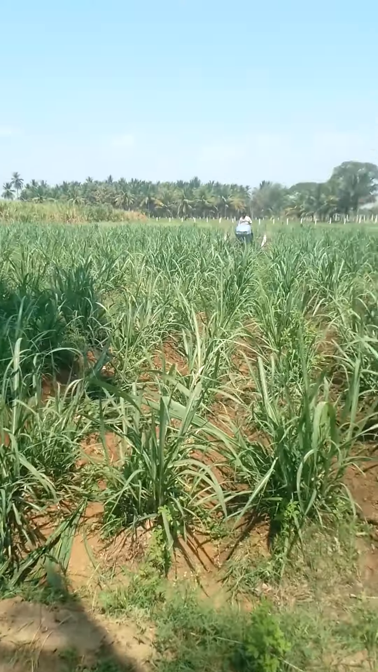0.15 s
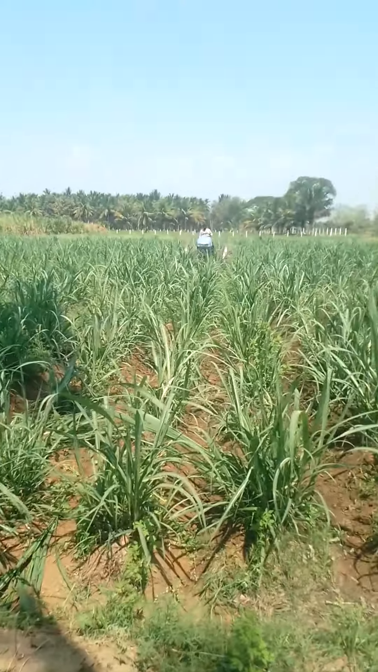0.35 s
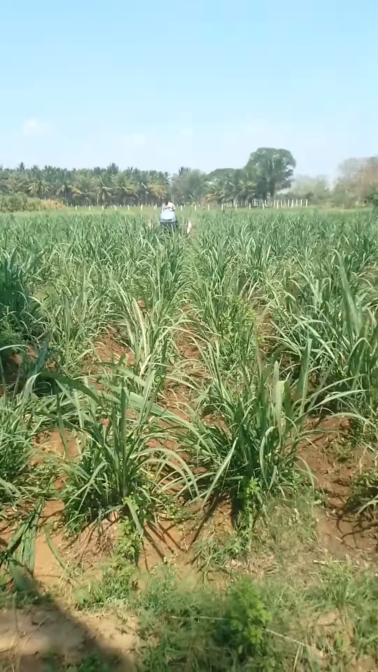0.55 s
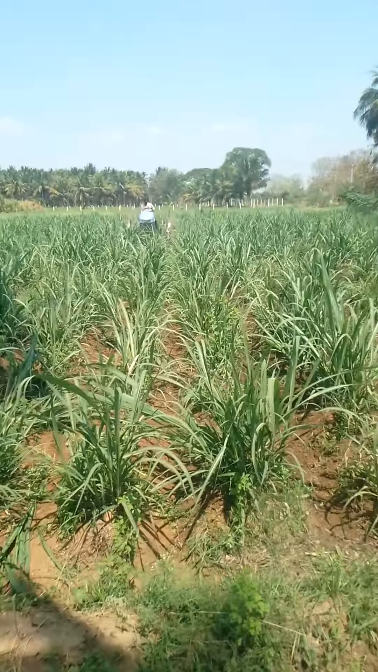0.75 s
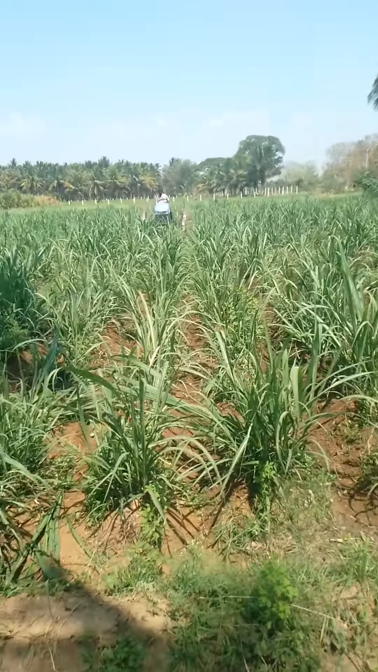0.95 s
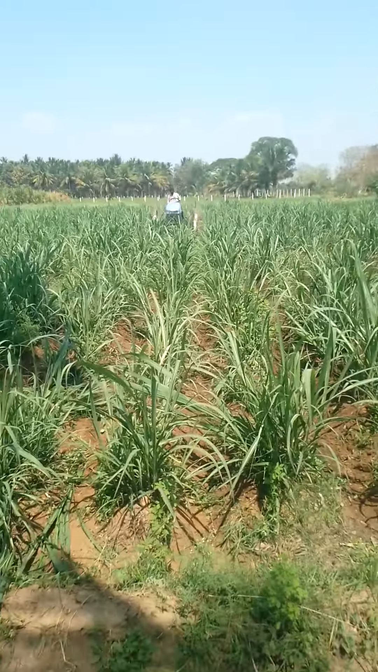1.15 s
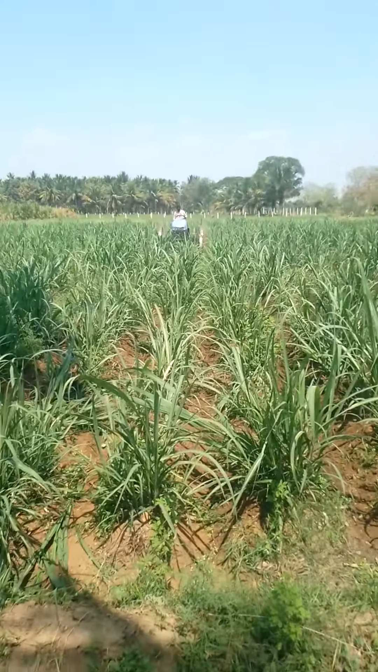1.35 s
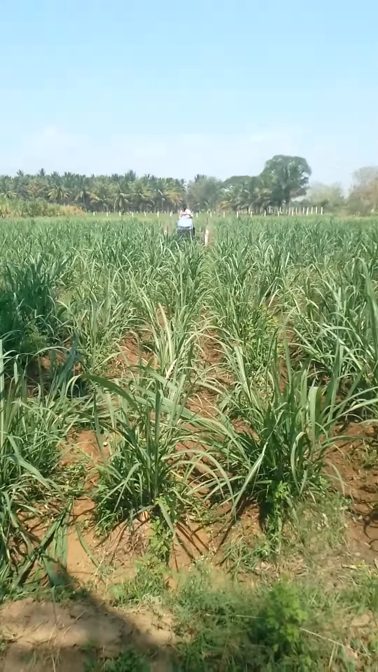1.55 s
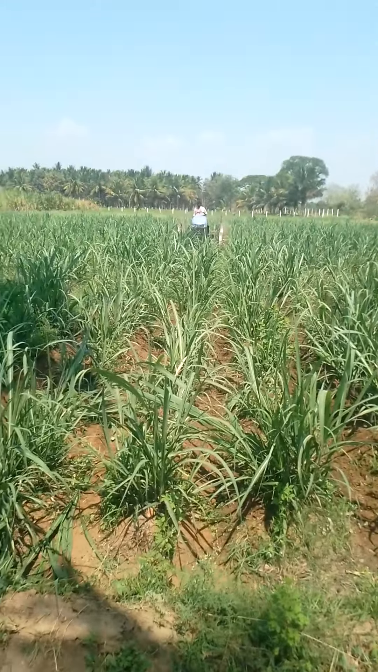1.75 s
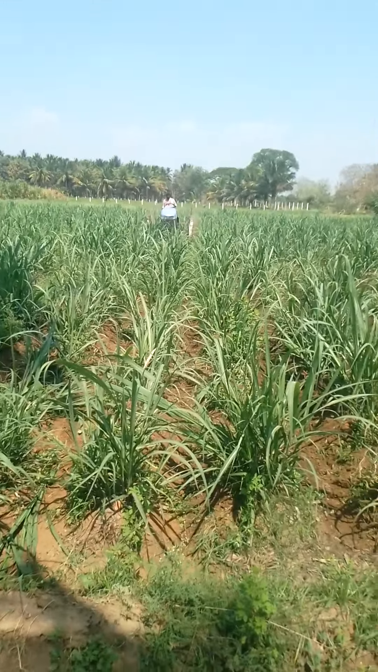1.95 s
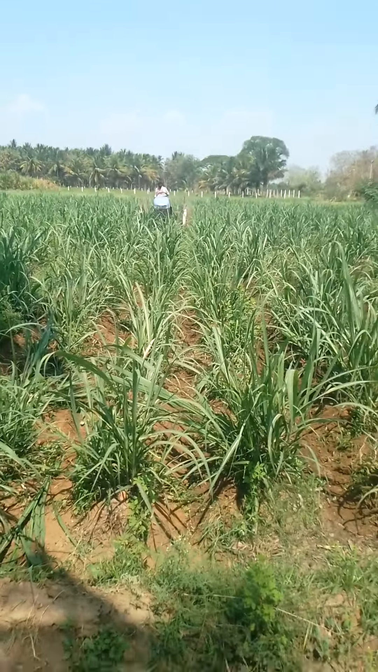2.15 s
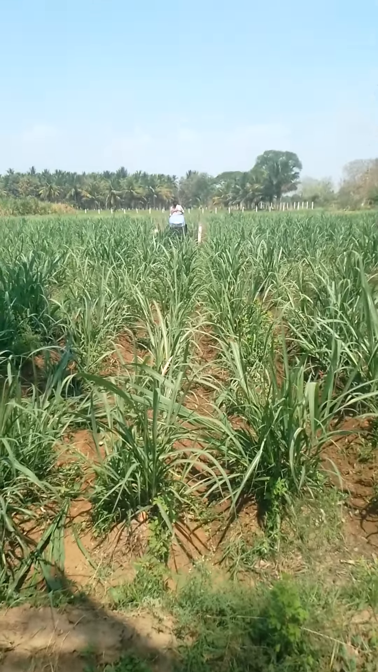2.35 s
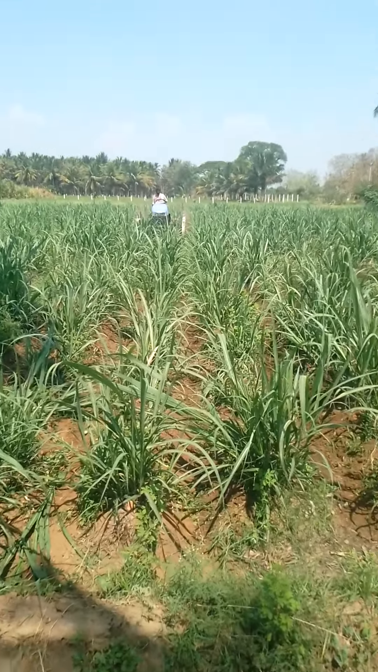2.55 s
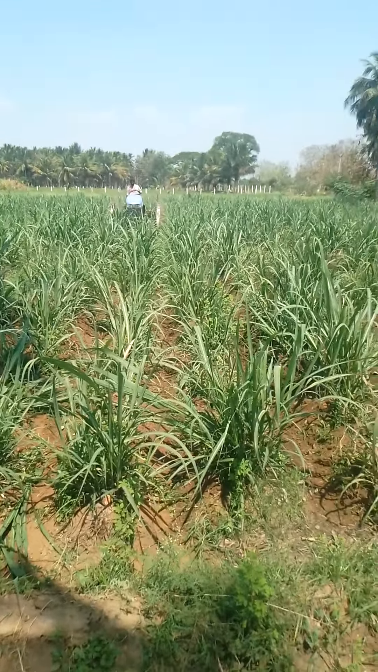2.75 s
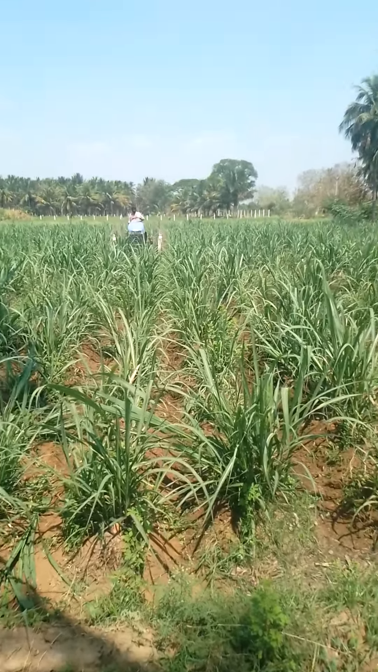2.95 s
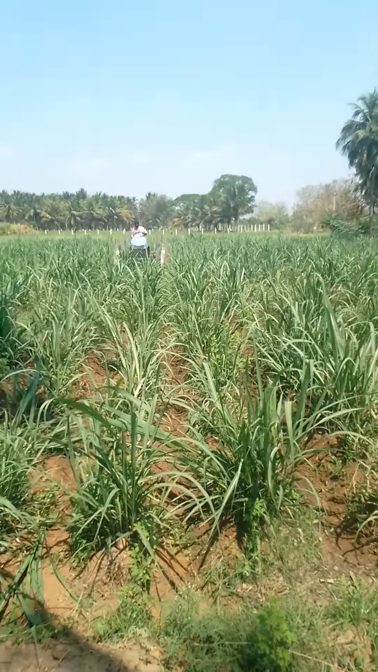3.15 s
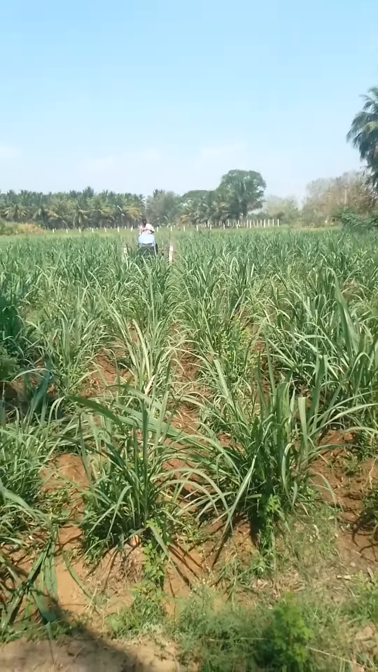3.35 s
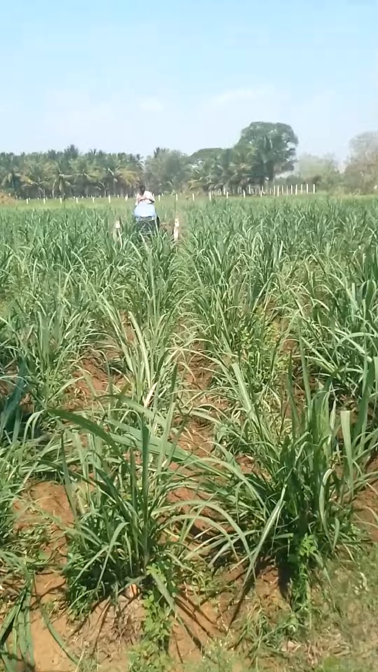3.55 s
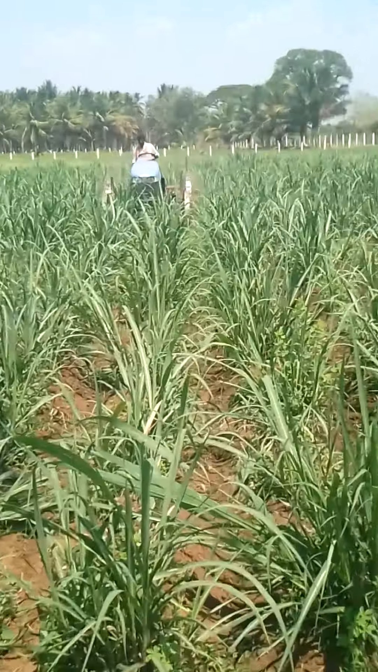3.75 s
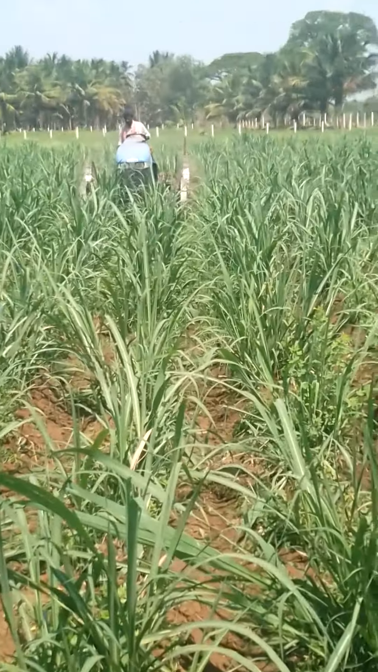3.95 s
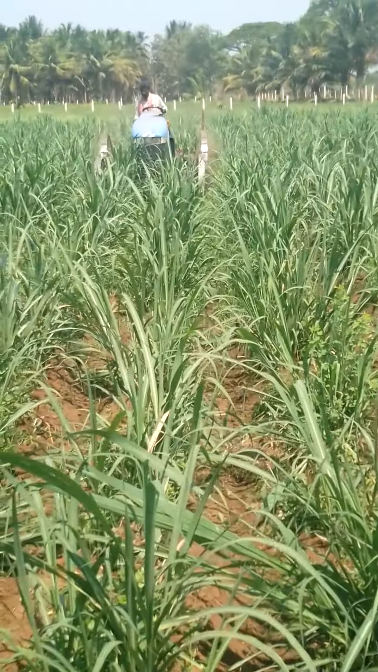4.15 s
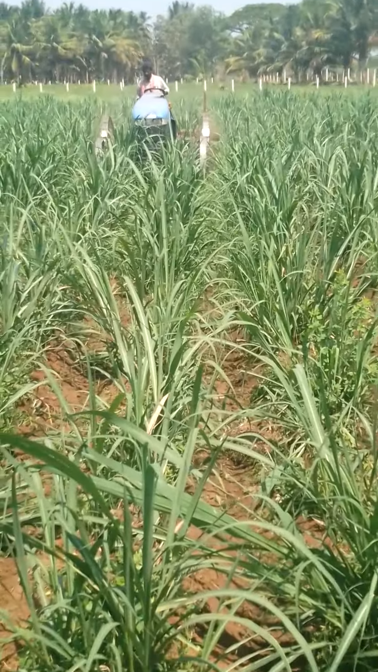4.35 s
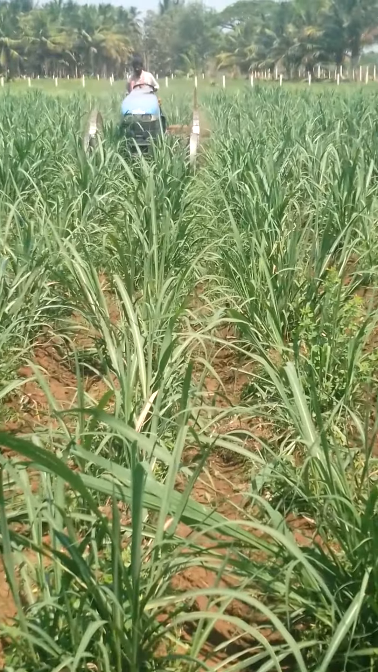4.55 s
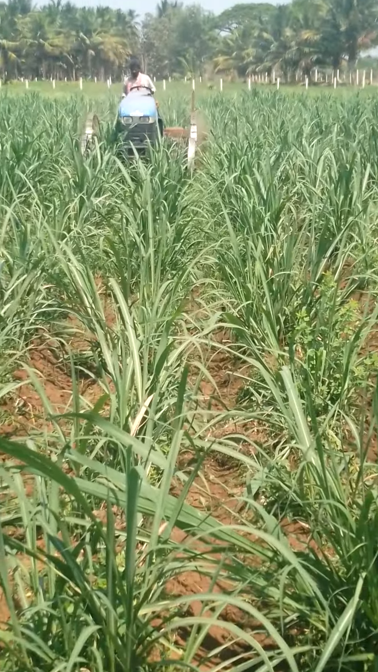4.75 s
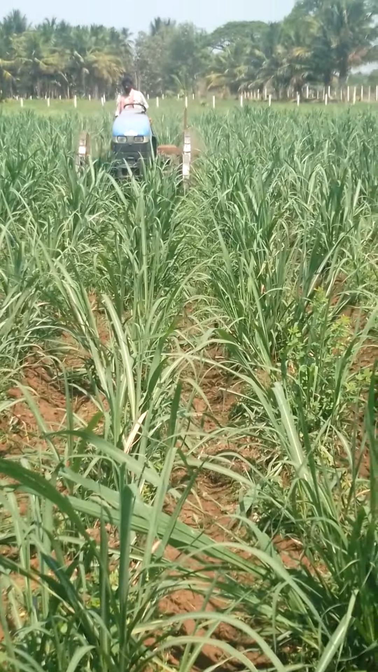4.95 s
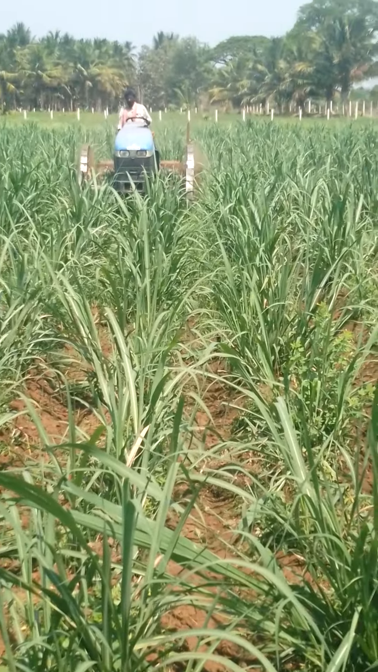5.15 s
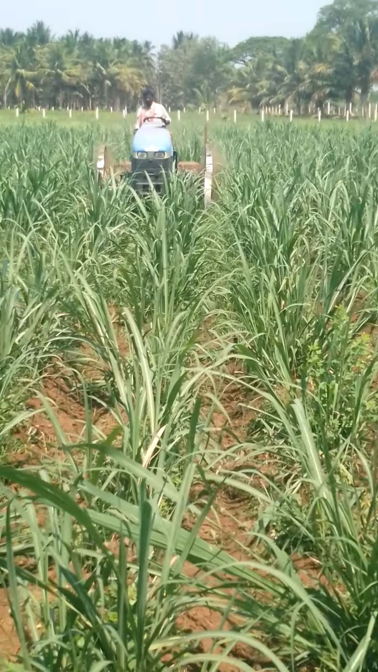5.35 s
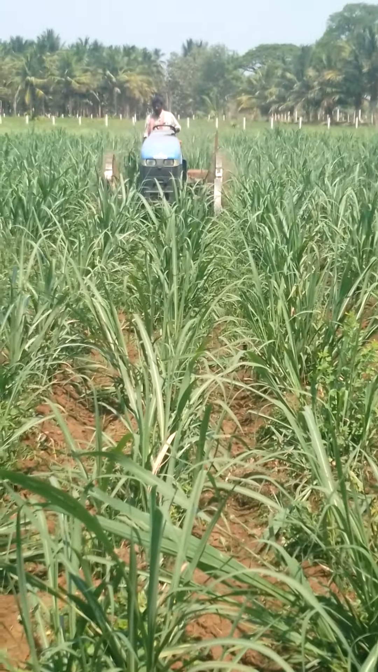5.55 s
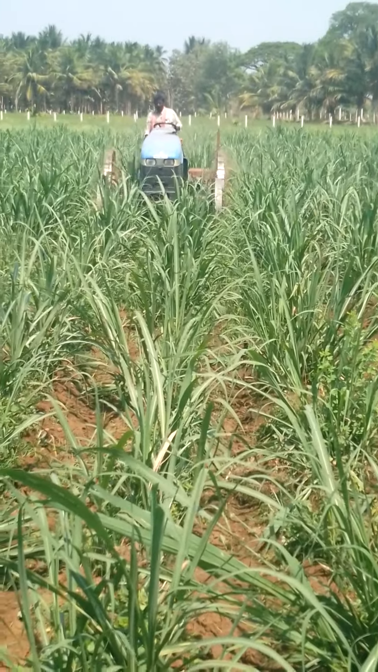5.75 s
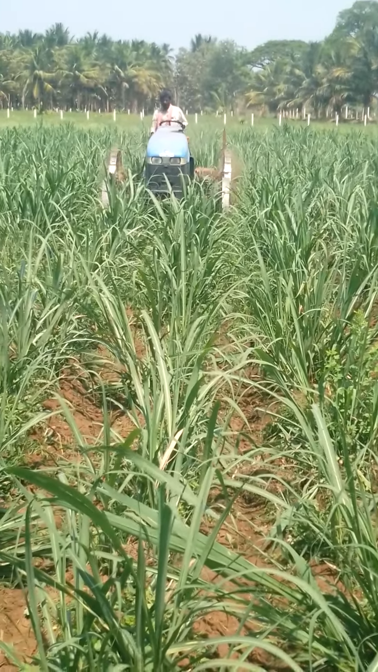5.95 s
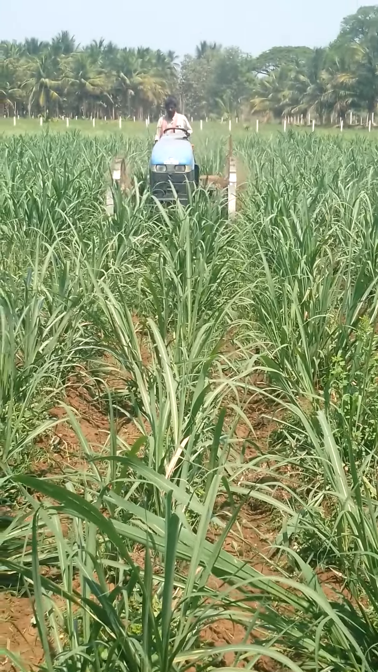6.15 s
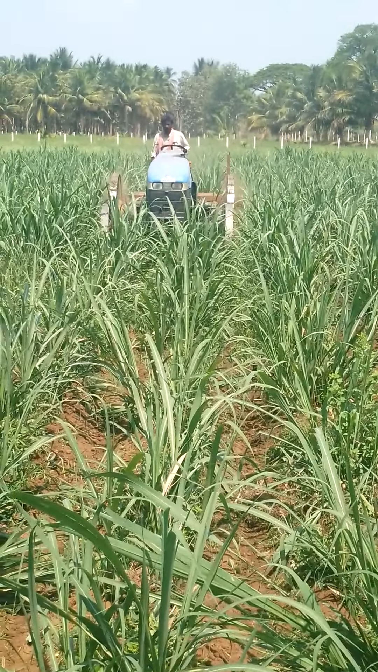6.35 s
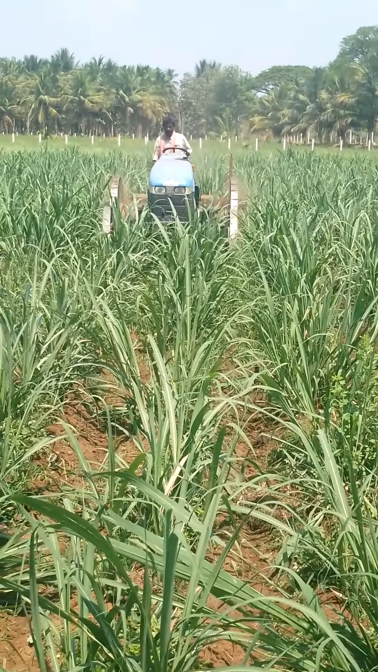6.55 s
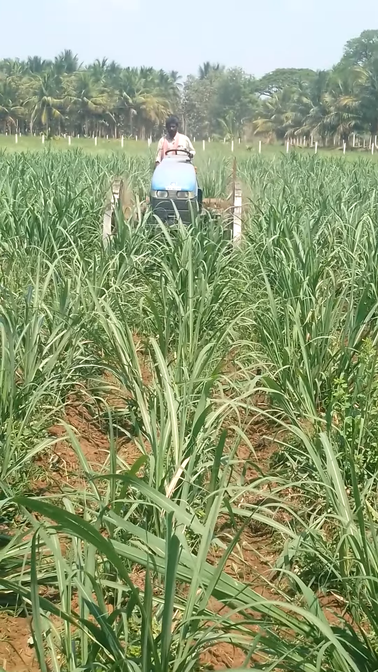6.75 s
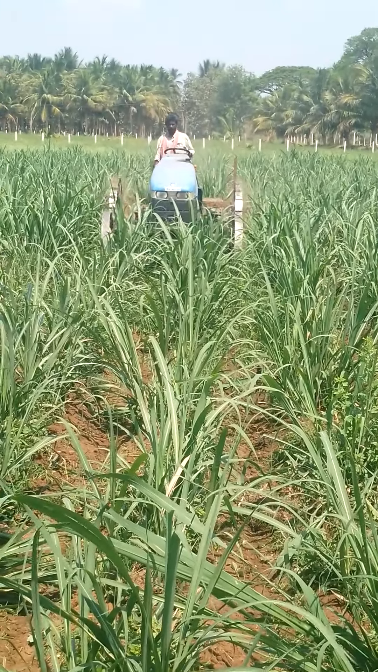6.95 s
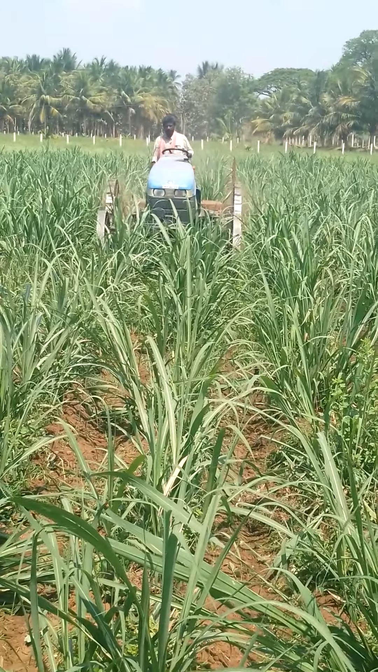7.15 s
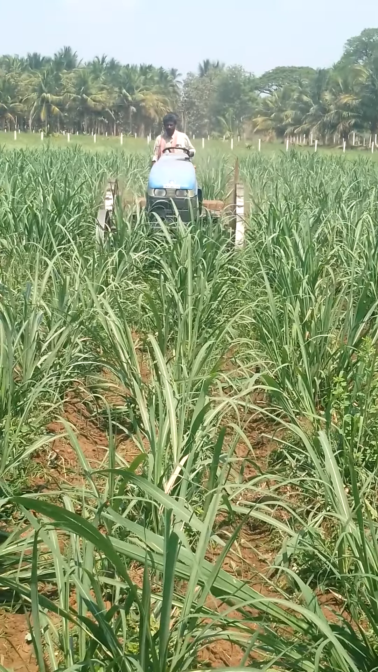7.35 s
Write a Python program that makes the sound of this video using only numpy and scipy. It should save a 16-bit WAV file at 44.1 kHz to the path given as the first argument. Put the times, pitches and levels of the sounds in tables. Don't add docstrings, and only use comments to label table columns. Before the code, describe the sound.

Open crop field, handheld phone: a distant diesel engine chugs quickly and evenly, muffled at first by leaves, then clearer and louder as it approaches. Each bite of the soil tines makes the rattle sharper and sags the speed slightly. A hard patch past the middle drags the engine down before it recovers, while a high, airy whistle pulses with the firings at left.

```python
import sys
import numpy as np
from scipy import signal
from scipy.fft import rfft, irfft, next_fast_len
from scipy.io import wavfile
from scipy.ndimage import uniform_filter1d, map_coordinates

SR = 44100
rng = np.random.default_rng(int(sys.argv[2]) if len(sys.argv) > 2 else 0)


def undo_db(level):
    steps = np.asarray(level, float) / 20
    return 10 ** steps


def master(y):
    cut = np.clip(np.atleast_2d(y).T, -1, 1)
    pcm = np.round(cut * 32767)
    wavfile.write(sys.argv[1], SR, pcm.astype(np.int16))


N = 330309

# t/s, left treble gain/dB, left lag/samples, hand echo/0-1,
# upper share of the whistle/0-1
TURN = [(0, -13, 5.64, 0.2, .5), (1.3, -6, 4.83, 0.45, 0.24), (1.7, -8, 5.6, 0.5, 0.4),
        (2.1, -7, 3.55, 0.5, .5), (2.5, -4.5, 4.65, 0.9, 0.1), (3.4, 1, 3.36, 0.5, 0.58),
        (4.1, 2.5, 3.7, .8, 1), (4.4, 2, 3.6, 0.4, 0), (5, 4, 3.1, 0.47, 0.35), (5.7, 5, 3.25, 0.56, 0.05),
        (6.4, 4, 3.16, 0.7, 0.54), (7.49, 5, 3, 0.1, 0.7)]


def unit(x):
    return x / np.sqrt(np.mean(x ** 2) + 1e-20)


def along(points, hz):
    f, v = np.transpose(points)
    return np.interp(np.log(hz + 1), np.log(f + 1), v)


def curves(rows):
    s, *cols = np.transpose(rows)
    return [np.interp(np.arange(N) / SR, s, c) for c in cols]


def wobble(rate_hz):
    coarse = np.arange(0, N + 8, 8)
    knots = rng.standard_normal(int(N * rate_hz / SR) + 4)
    return np.interp(np.arange(N), coarse, map_coordinates(knots, [coarse * rate_hz / SR]))


def filtered(x, response):
    m = next_fast_len(N + SR // 2)
    return irfft(rfft(x, m) * response(np.fft.rfftfreq(m, 1 / SR)), m)[..., :N]


def resonance(f, hz, width_hz):
    return 1j * f * width_hz / (hz * hz - f * f + 1j * f * width_hz)


def delayed(x, samples):
    return map_coordinates(x, [np.arange(N) - samples])


def sides(db):
    return undo_db(np.array([db / 2, -db / 2]))


def stereo(near, scattered):
    # f/Hz, left-right likeness/0-1
    likeness = [(60, 0.74), (200, 0.82), (330, 0.99), (700, 1), (1200, 0.73), (2400, 1), (3100, 0.37),
                (3900, 0.72), (6000, 0.48), (12000, 0.26)]

    def split(hz):
        turn_rad = np.arccos(np.clip(along(likeness, hz), 0, 1)) / 2
        return np.array([np.cos(turn_rad), np.sin(turn_rad)])

    mid, side = filtered(np.array([near, scattered]), split)
    return np.array([delayed(mid + side, curves(TURN)[1]), mid - side])


def blows(cycles, share, db, scatter_db):
    at = np.flatnonzero(np.diff(np.floor(cycles - share)) > 0)
    out = np.zeros(N)
    out[at] = undo_db(db + scatter_db * rng.standard_normal(len(at)))
    return out


def surges():
    # t/s, rate/firings per s
    governed = [
        (0.0, 40.312),
        (1.5, 39.811),
        (3.0, 40.127),
        (4.3, 40.246),
        (4.85, 39.036),
        (5.5, 40.506),
        (6.5, 40.791),
        (7.49, 39.892),
    ]
    # t/s, half length/s, harder rattle/dB, speed swing/firings per s
    bites = [(0.606, 0.152, 10, 1.06), (1.222, 0.2, 9, 1.58), (1.549, 0.126, 5, 0.97),
             (1.84, 0.167, 12, 1.68), (2.429, 0.098, 8, 0.76), (3.074, 0.183, 6.5, 0.44),
             (3.605, 0.168, 9, 0.86), (4.001, 0.2, 5.5, 0.35), (4.363, 0.129, 9, 1.19),
             (4.892, 0.123, 9, 1.6), (5.112, 0.122, 13.5, 2.21), (5.496, 0.142, 5.5, 0.38),
             (5.984, 0.125, 7.5, 0.82), (6.422, 0.064, 5.5, 0.78), (6.874, 0.2, 9.5, 1.6),
             (7.161, 0.074, 5.5, 1.0)]
    s, half_s, db, swing = np.transpose(bites)[:, :, None]
    coarse = np.arange(0, N, 64)
    u = (coarse / SR - s) / half_s
    bell = np.exp(-u ** 2 / 2)
    hard_db = np.interp(np.arange(N), coarse, (db * bell).sum(0))
    dip = np.interp(np.arange(N), coarse, (swing * u * bell).sum(0))
    return hard_db, curves(governed)[0] + dip


def level(start_db, db_per_s, surge_share):
    return start_db + db_per_s * np.arange(N) / SR + surge_share * surges()[0]


def port_levels():
    clear_s, clear_db = 1.84, 4.0
    cleared_db = clear_db * np.clip(np.arange(N) / SR / clear_s, 0, 1)
    whistle_db = level(-63.5, 2.82, 1.09) + 0.46 * curves(TURN)[0]
    return whistle_db, level(-66.5, 0.92, 0.47) + cleared_db


def exhaust(cycles):
    orders = [(2.97, -12, 1), (5.9, 0.5, 2.5), (8.92, -5.5, -2), (14.98, -14.5, 3), (17.82, -13.5, 0),
              (24, -12.5, 7)]
    out = np.zeros((2, N))
    for order, db, pan_db in orders:
        tone = np.cos(2 * np.pi * round(order) * (cycles - 1 / 6))
        out += sides(pan_db)[:, None] * undo_db(db + 0.49 * wobble(4.1)) * tone
    return undo_db(level(-66.5, 0.71, 0.073) + 0.5) * out


def gears(cycles, block_db):
    # multiple of the mesh rate, level/dB, left-right/dB, left lead/rad
    mesh = [(2, -12, -9, 1.4), (3, -20, -14, 0.1), (4, -23.5, 12, 0.41), (5, -15.5, -10.5, 0.33),
            (6, -14, -2, 0.16)]
    teeth, usual_speed = 16, 40.2
    out = np.zeros((2, N))
    for k, db, pan_db, lead_rad in mesh:
        phase = 2 * np.pi * teeth * round(k) * cycles + 0.6 * wobble(14)
        size = undo_db(db + 1.8 * wobble(8) + 4.5 * wobble(40))
        out += sides(pan_db)[:, None] * size * np.cos(phase + np.array([[lead_rad], [0]]))
    mesh_db = 0.9 - 0.35 * np.arange(N) / SR + 0.5 * (usual_speed - surges()[1])
    return undo_db(block_db + mesh_db) * out


def block(cycles, block_db):
    # place/48ths of the engine cycle (rounded), level/dB
    valves = [(5, 0.5), (11, 5), (22, -9), (29, -1.5), (36, -1), (43, -2.5)]
    # f/Hz, width/Hz, level/dB
    modes = [(259, 57, -17.5), (430, 25.6, -4.5), (675.2, 59, 7.5), (1094, 69, -6), (1343, 250, -14)]
    # f/Hz, density/dB per Hz
    roar_colour = [(10, -63), (25, 2), (60, -13), (110, -14), (170, -19.5), (260, -7.5), (380, -10.5),
                   (520, -5.5), (680, -2), (900, -6), (1100, -3), (1500, -6.5), (2200, -9.5), (4000, -13.5)]
    # f/Hz, left-right/dB
    lean = [(60, 10), (210, 3), (330, 1.5), (500, -2.5), (770, 2), (1200, 1), (1800, -0.5), (3000, 4)]

    def body(f):
        return sum((-1) ** k * undo_db(db) * resonance(f, hz, width) * resonance(f, hz, 3 * width)
                   for k, (hz, width, db) in enumerate(modes))

    hits = sum(blows(cycles, round(step) / 48, db, scatter_db=1.2) for step, db in valves)
    knock = unit(filtered(hits, body))
    throb = undo_db(0.5 * np.cos(2 * np.pi * (3 * cycles - 0.55)) + 0.9 * wobble(12))
    noise = throb * rng.standard_normal((2, N))
    roar, scattered = unit(filtered(noise, lambda hz: undo_db(along(roar_colour, hz))))
    pair = stereo(undo_db(-7) * knock + undo_db(2.0) * roar, undo_db(0.4) * scattered)
    leaning = filtered(pair, lambda hz: sides(along(lean, hz)) / (1 + (45 / (hz + 1)) ** 4))
    return undo_db(block_db + 1.5) * leaning


def rattle(cycles):
    # f/Hz, density/dB per Hz
    left_port = [(600, -23), (1500, -4.5), (2200, -4), (2550, -2), (3100, -1.5), (5000, -1), (6500, 3),
                 (8600, 3), (10000, -1.5), (12000, -6), (14200, -10.5), (15500, -48)]
    right_port = [(600, -65), (1500, -8.5), (2100, -8.5), (2420, -3), (2800, -8.5), (3400, -5.5),
                  (6000, -9), (8500, -10), (10700, 1.5), (11800, -1), (12500, -10), (14200, -23),
                  (15500, -66)]
    # t/s, peak/dB
    hardest = [(3.6559, -33), (3.6808, -30), (4.0769, -36), (4.3024, -33), (4.3283, -31), (4.3523, -28),
               (4.7808, -35), (4.8342, -31), (4.9374, -27), (4.9634, -26), (5.0158, -26), (5.0402, -25),
               (5.0911, -25), (5.1155, -26), (5.9781, -28), (6.443, -34), (6.6935, -30), (6.7179, -29),
               (6.7438, -24), (6.7932, -27), (6.8177, -29), (6.8686, -25), (6.8955, -26), (6.9179, -29),
               (6.9429, -27), (7.0901, -27), (7.114, -25), (7.1629, -24), (7.2113, -31), (7.3101, -32)]
    # t/s, f/Hz
    lifted = [(0, 7700), (3.5, 8020), (4.25, 7850), (5, 7600), (5.75, 7310), (6, 7450), (6.2, 7450),
              (6.32, 7250), (7.49, 7230)]
    whistle_db, rattle_db = port_levels()
    treble_db, _, echo, upper = curves(TURN)

    t = np.arange(SR // 40) / SR
    burst = (1 - np.exp(-t / 0.0024)) ** 2 * (np.exp(-t / 0.002) + 0.066 * np.exp(-t / 0.0064))
    firing = blows(3 * cycles + 0.022 * wobble(40), 0.3685, 0, scatter_db=2.0)
    at = np.flatnonzero(firing)
    for s, db in hardest:
        nearest = at[np.argmin(abs(at - s * SR))]
        firing[nearest] = undo_db(db - whistle_db[nearest] - 3.0)
    hits = undo_db(2.8 * np.tanh(wobble(800)))
    gate = signal.fftconvolve(firing, burst)[:N] * hits
    ticks = undo_db(2.7 * wobble(300) - 0.19 * (whistle_db + 59.0))

    even = firing ** 0.6
    first = delayed(even, 85 + 12 * wobble(40))
    rebound = delayed(even, 150 + 30 * wobble(40))
    spikes = 8.5 * first - 6 * rebound * undo_db(3 * wobble(40))
    noise = unit(gate + 0.093 * ticks) * rng.standard_normal((2, N))
    drive = stereo(*(noise + spikes * [[1], [0.6]]))

    hiss = rng.standard_normal((2, N)) * undo_db([[-12], [-8]])
    left, right = filtered(drive + hiss,
                           lambda hz: undo_db(np.array([along(left_port, hz), along(right_port, hz)])))
    high = filtered(left, lambda hz: 1 / (1 + (7000 / (hz + 1)) ** 4))
    left = left + (undo_db(treble_db + 0.78 * wobble(8.9)) - 1) * high

    lower, higher = filtered(drive[0] + 0.29 * hiss[0], lambda f: resonance(f, 7570, 1380)
                             * np.array([resonance(f, 7605, 540), resonance(f, 7915, 510)]))
    share = np.clip(upper, 0, 1)
    cavity = (1 - share) * lower + share * higher
    late = 15 * SR / curves(lifted)[0]
    whistle = cavity + echo * delayed(cavity, late) + echo ** 2 / 2 * delayed(cavity, 2 * late)
    whistle = whistle / np.sqrt(1 + echo ** 2)

    wide = undo_db(rattle_db + 1.0) * np.array([left, right]) / np.std(right)
    return wide + np.array([undo_db(whistle_db - 2.85) * unit(whistle), np.zeros(N)])


def ping(cycles):
    # f/Hz, width/Hz, level/dB
    modes = [(2450, 216, 0.5), (2630, 80, 3), (3035, 140, -1.5)]
    t = np.arange(SR // 50) / SR
    hits = blows(3 * cycles, 0.42, 0, scatter_db=2.5)
    gate = signal.fftconvolve(hits, t / 0.002 * np.exp(-t / 0.002))[:N]

    def head(f):
        return sum(undo_db(db) * resonance(f, hz, width) ** 2 for hz, width, db in modes)

    rings = unit(filtered((gate + 0.21) * rng.standard_normal((2, N)) + 2.1 * hits, head))
    ping_db = port_levels()[1] - 9.0 + 0.14 * surges()[0]
    return undo_db(ping_db) * sides(4.1)[:, None] * stereo(*rings)


def knocks():
    # t/s, peak/dB, f/Hz, t60/s, left-right/dB
    taps = [
        (.304, -38.5, 10900, 0.006, -18),
        (.304, -42.5, 5900, .008, 12),
        (.304, -41, 2600, 0.0084, .1),
        (1.514, -48, 292, 0.049, 22),
        (1.586, -48, 300, 0.029, 30),
        (2.132, -44, 3140, 0.015, 17),
        (2.132, -45.5, 2630, 0.026, 9),
        (2.132, -47.5, 2040, 0.04, 4),
        (5.483, -38, 2450, 0.026, 2),
        (4.835, -35, 13600, 0.0042, 12),
    ]
    out, t = np.zeros((2, N + SR)), np.arange(SR // 10) / SR
    for s, db, hz, t60_s, pan_db in taps:
        ring = undo_db(db - 60 * t / t60_s) * (1 - np.exp(-t * hz / 2)) * np.sin(2 * np.pi * hz * t)
        out[:, round(s * SR):][:, :len(t)] += sides(pan_db)[:, None] * ring
    return out[:, :N]


def scene():
    first_firing = 0.17
    cycles = (first_firing + np.cumsum(surges()[1]) / SR) / 3
    block_db = level(-62.5, 0.85, 0.05)
    engine = exhaust(cycles) + gears(cycles, block_db) + block(cycles, block_db)
    return engine + rattle(cycles) + ping(cycles) + knocks()


def thrift(pair):
    mid_side = np.array([pair[0] + pair[1], pair[0] - pair[1]]) / 2
    hz, _, z = signal.stft(mid_side, SR, nperseg=2048)
    power = uniform_filter1d(np.abs(z) ** 2, size=16, axis=1)
    power = power[:, ::16].repeat(16, axis=1)[:, :len(hz)]
    presence = ((hz > 1800) & (hz < 5300))[:, None]
    weak = (power < power[::-1] * undo_db(-2 * 5.9)) & presence
    total, difference = signal.istft(np.where(weak, 0.008 * z, z), SR, nperseg=2048)[1][:, :N]
    return np.array([total + difference, total - difference])


def top_cut(x):
    return signal.sosfilt(signal.butter(12, 15600, fs=SR, output="sos"), x)


def record(dry):
    fade_s, top_hz = 0.0033, 14250
    fade = np.clip(np.arange(N) / SR / fade_s, 0, 1)
    kept = filtered(thrift(dry * fade), lambda hz: undo_db(-np.clip(hz - top_hz, 0, 1100) / 17))
    return top_cut(kept)


dry = scene()
out = record(dry)
master(out)
```